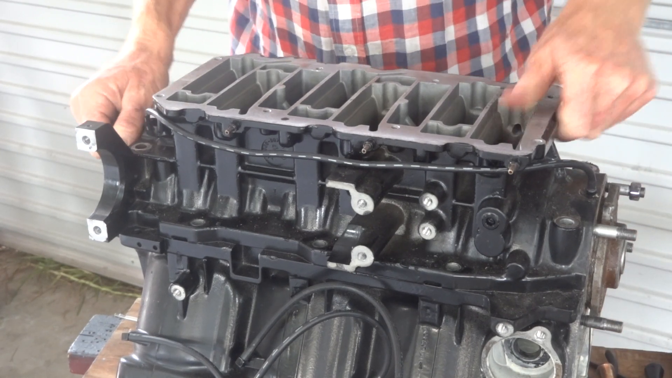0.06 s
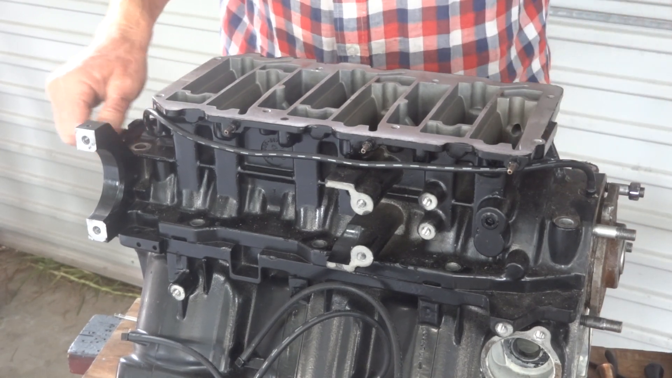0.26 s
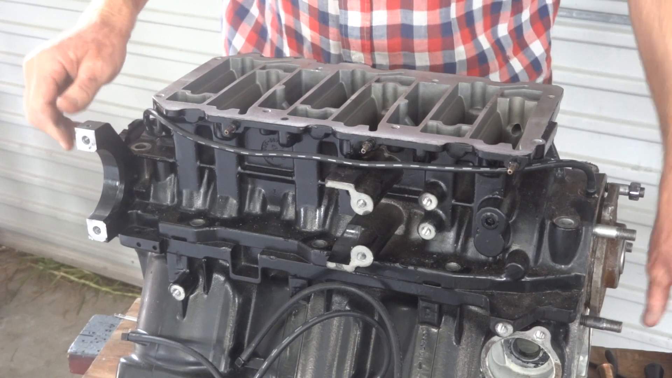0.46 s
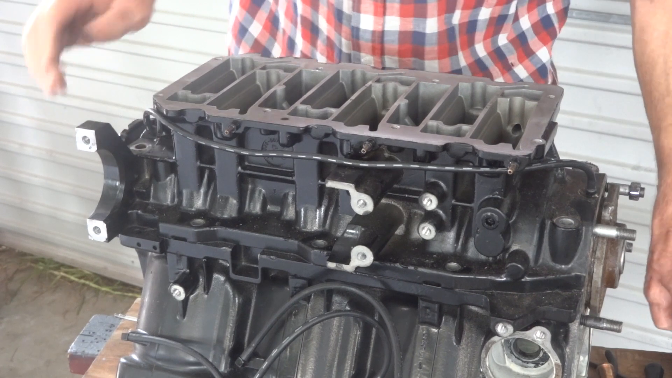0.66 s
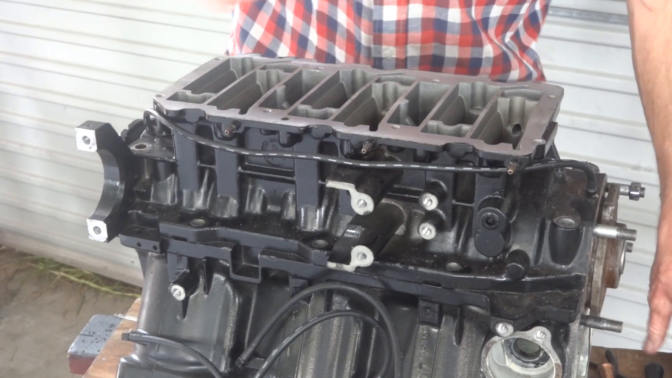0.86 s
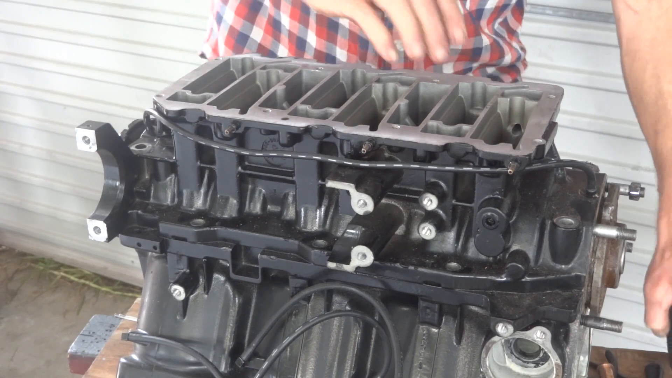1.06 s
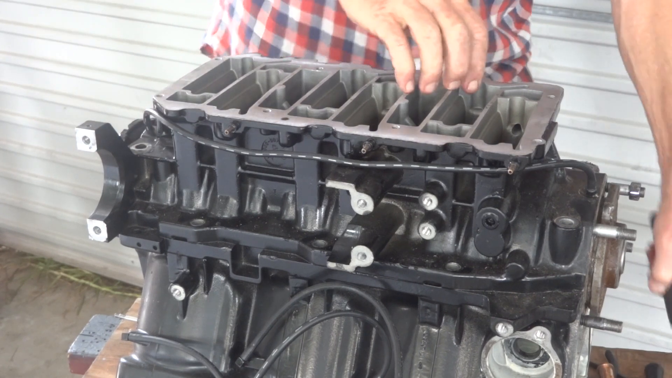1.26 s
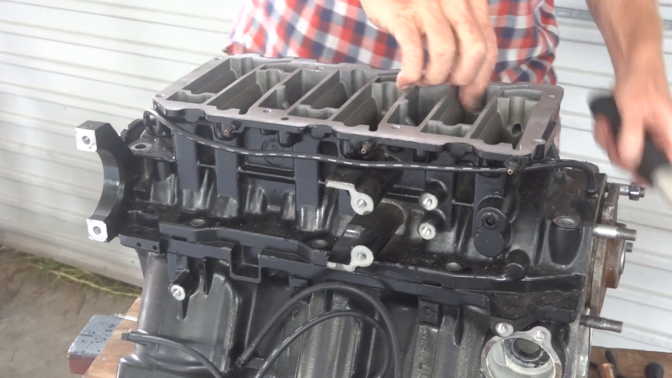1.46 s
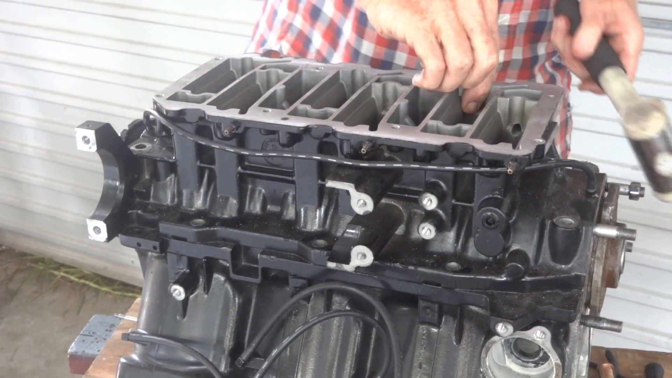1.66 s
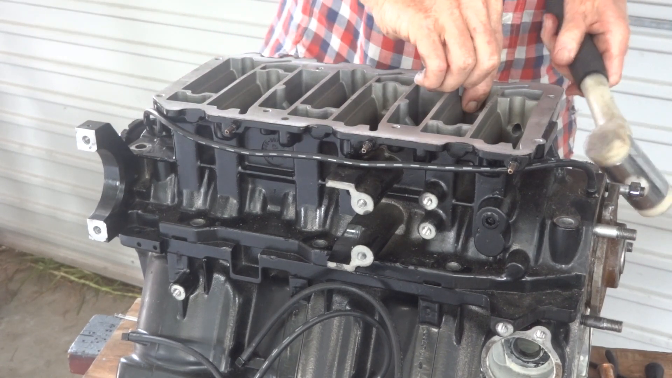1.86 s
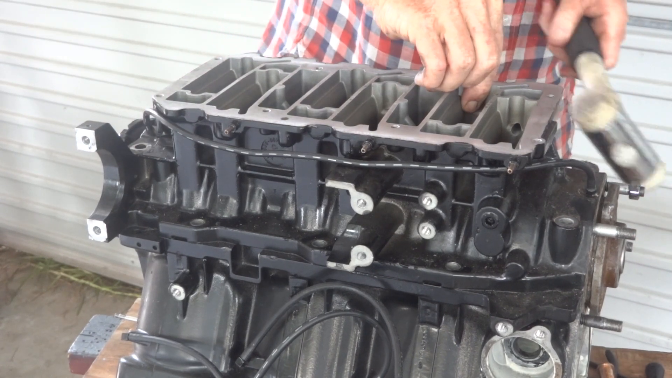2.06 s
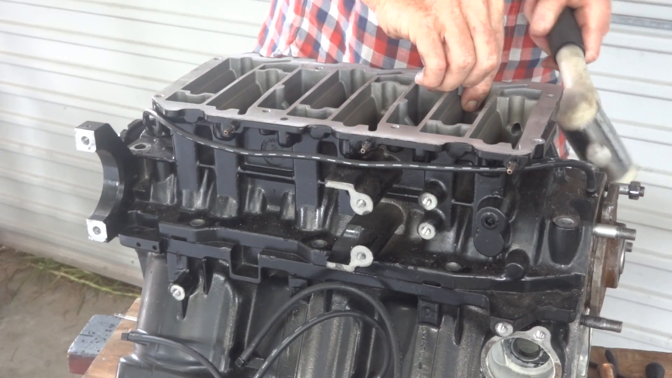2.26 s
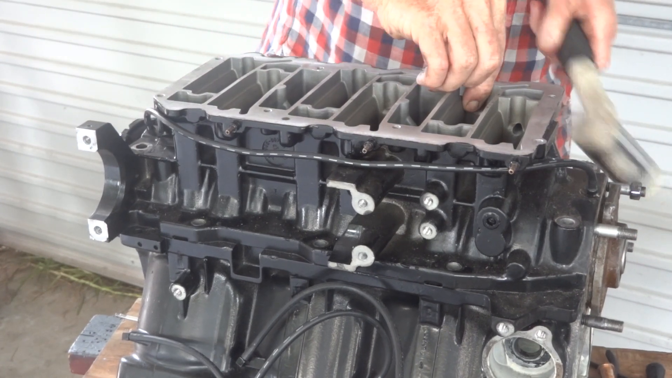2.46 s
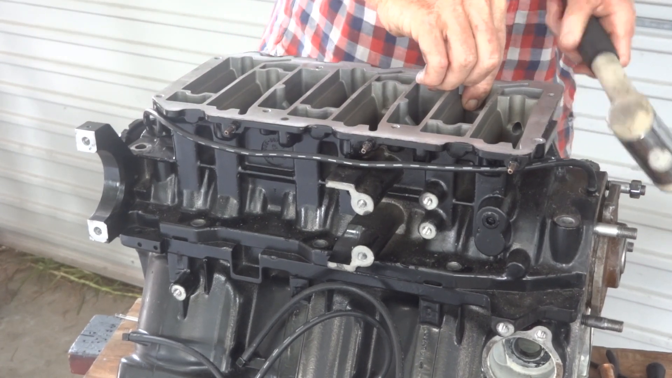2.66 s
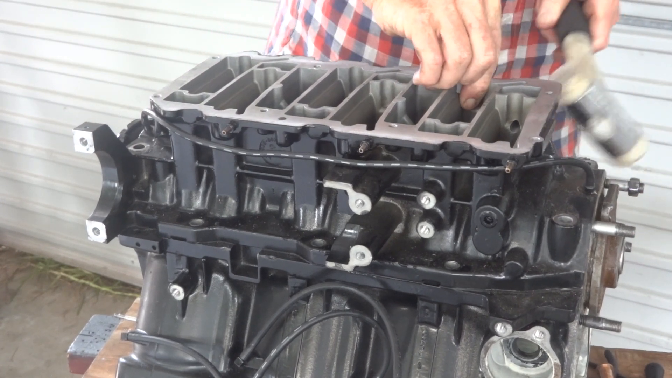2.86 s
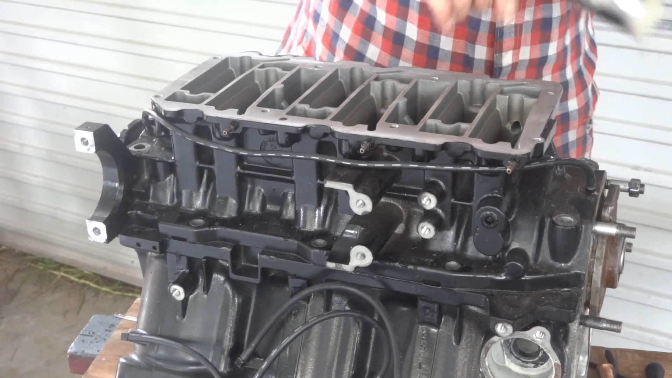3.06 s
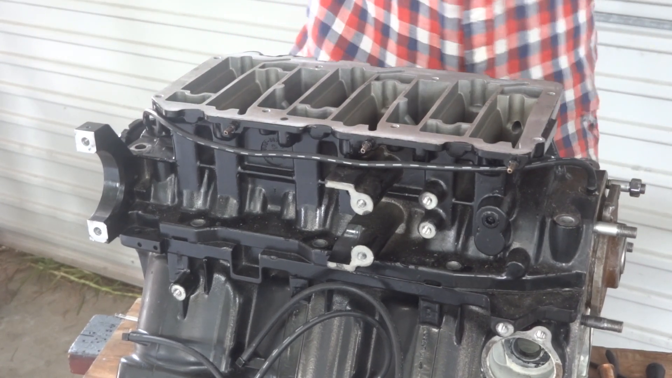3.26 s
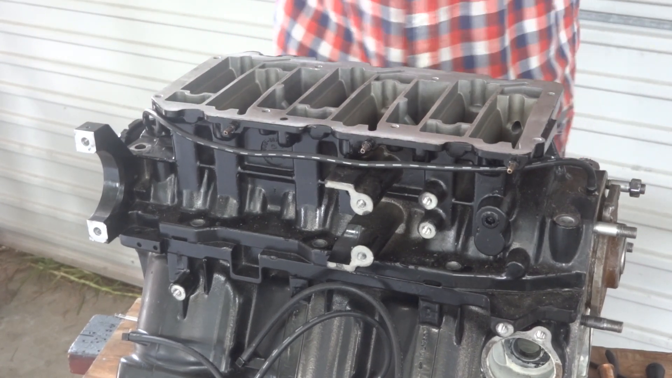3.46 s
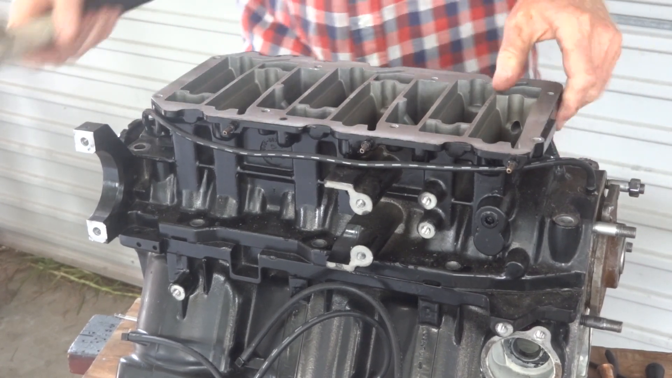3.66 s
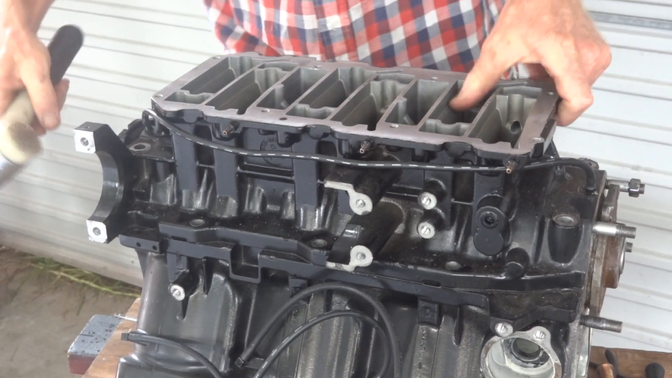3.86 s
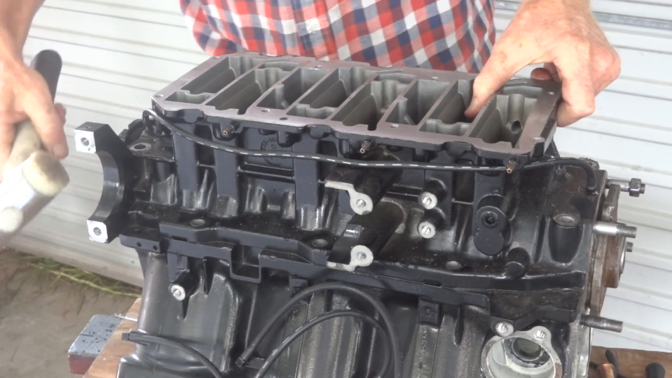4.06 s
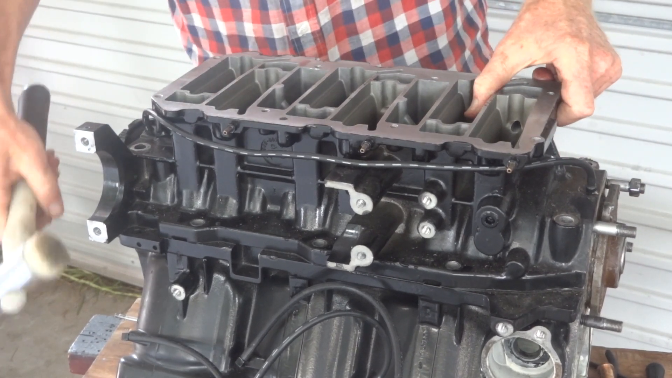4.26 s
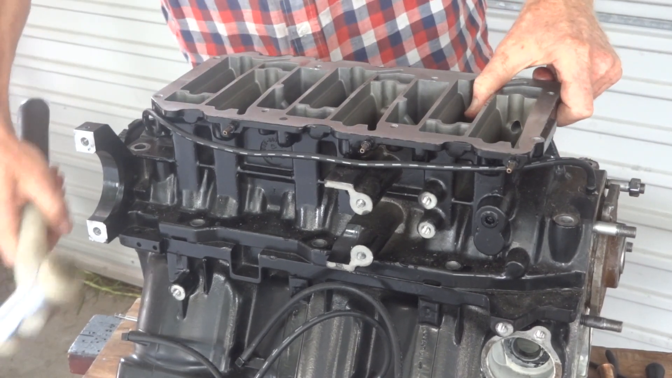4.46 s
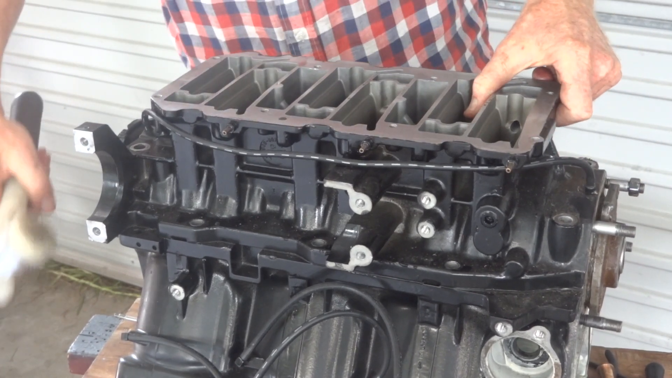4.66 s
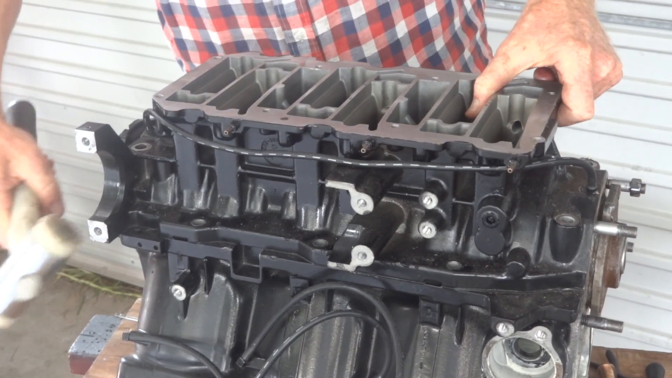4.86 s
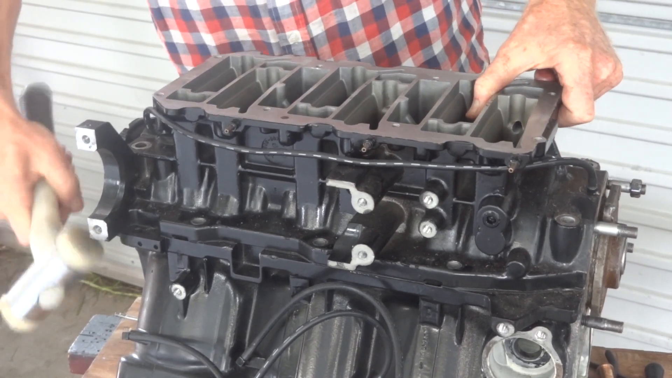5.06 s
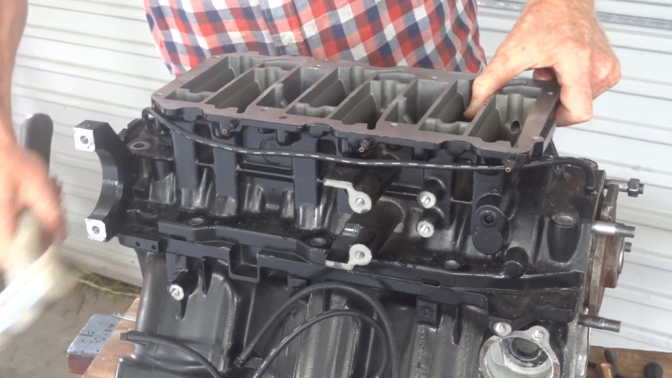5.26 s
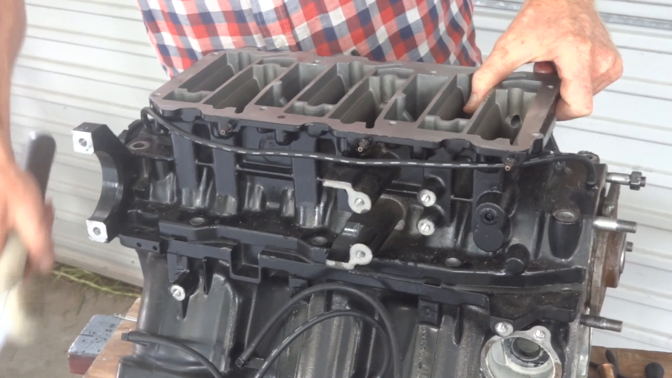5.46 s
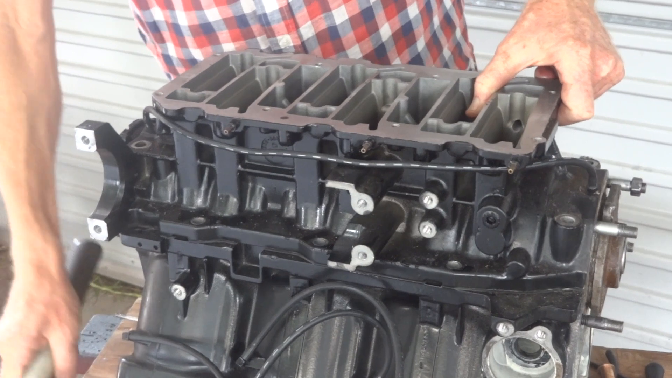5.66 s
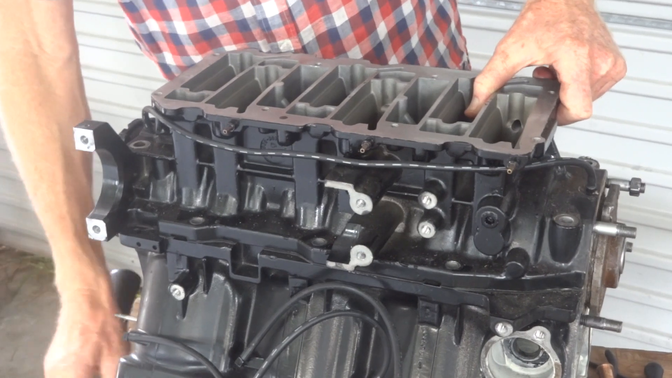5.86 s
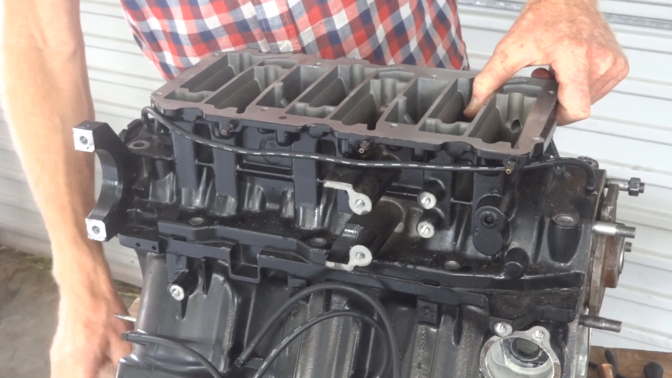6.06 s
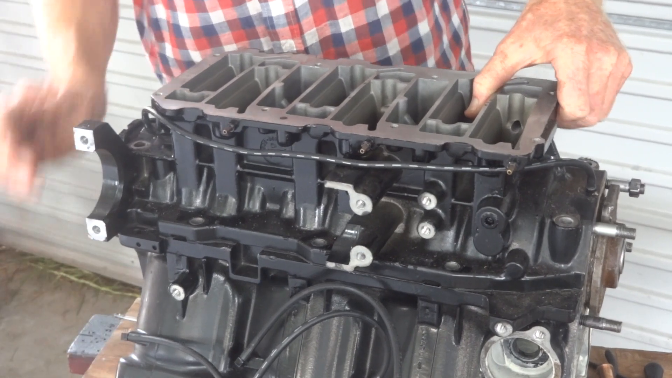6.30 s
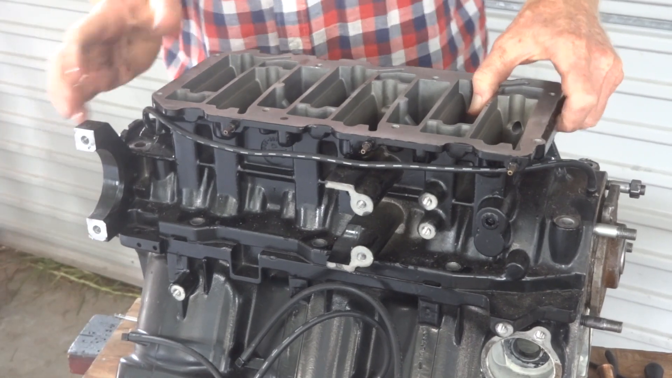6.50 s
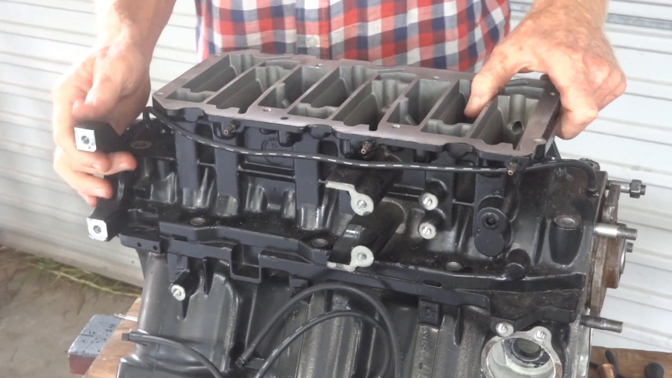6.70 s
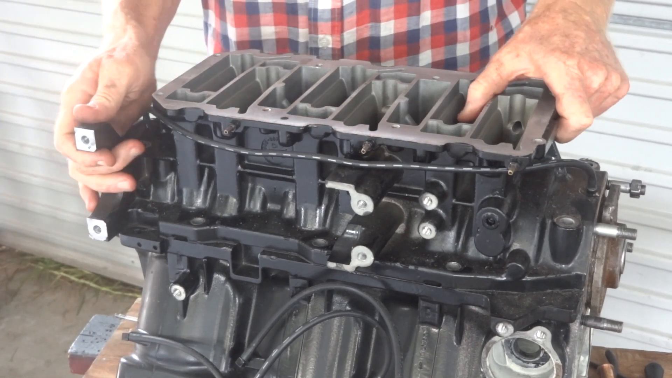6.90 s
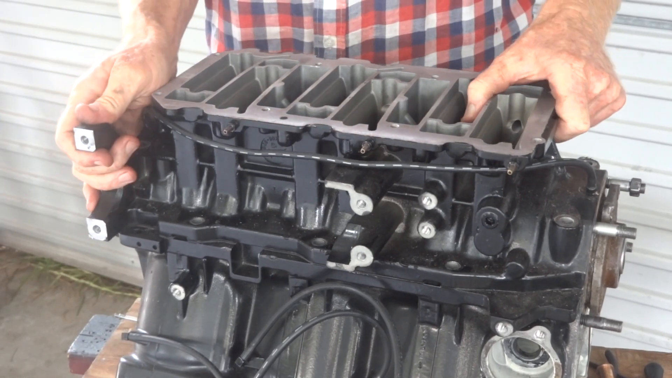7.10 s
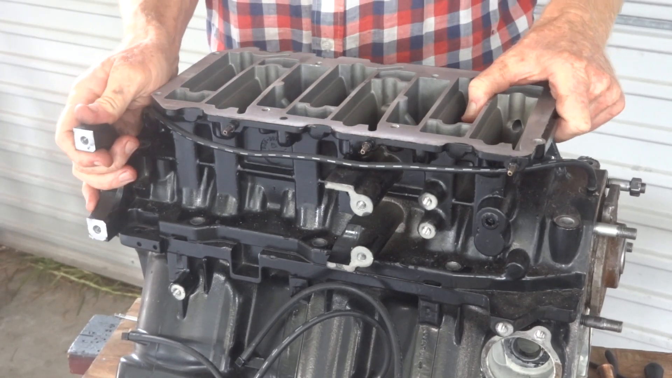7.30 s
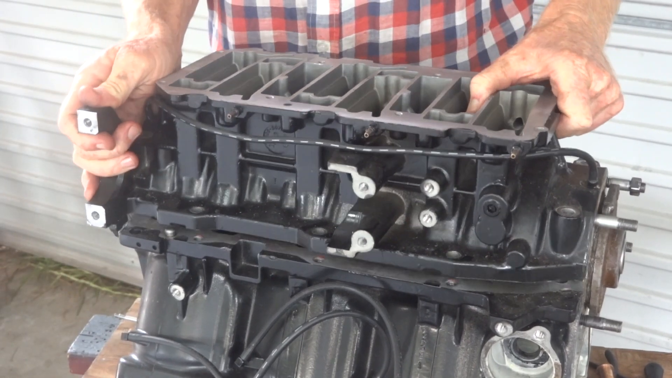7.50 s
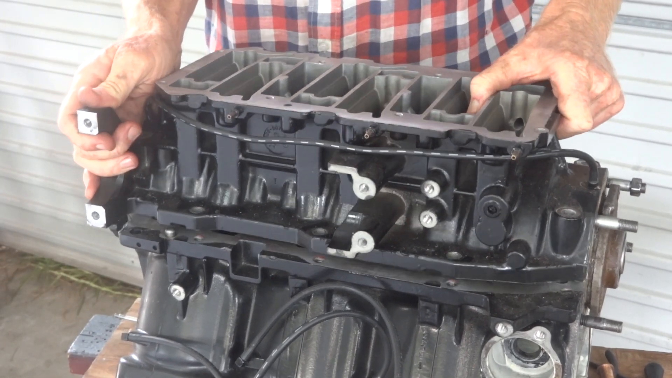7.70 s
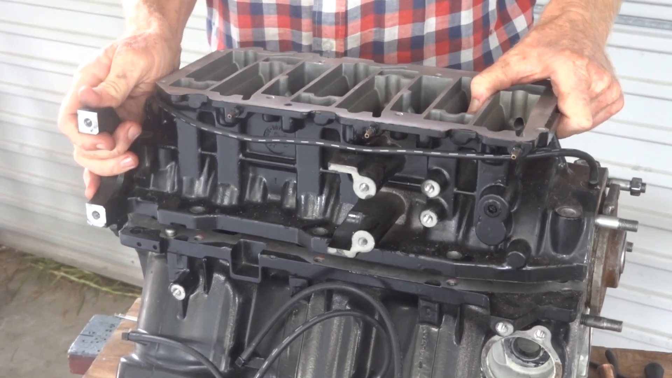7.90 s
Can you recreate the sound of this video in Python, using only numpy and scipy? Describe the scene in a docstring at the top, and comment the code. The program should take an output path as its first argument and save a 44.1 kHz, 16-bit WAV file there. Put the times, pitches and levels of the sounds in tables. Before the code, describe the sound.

Close stereo microphones in a workshop shed catch faint airy noise, low mains hum and thin insect buzz. After rustling and a wooden bump come four heavy mallet blows on a dense metal casting, which rocks and knocks on its supports. A gap follows, then four brighter blows at the other end, a thud as the mallet is laid down, small ticks, and finally a brief loose metal clank.

```python
"""A shed with a workbench: a soft mallet strikes a metal engine casting, four times at each end.
Blows are damped sines plus short-lived noise; the casting rocks and knocks on its wooden supports.
The mallet is picked up and laid down, cloth and hands rub (grainy noise), small parts tick (short sines and clicks),
and the loosened upper casting clanks as it is lifted. Behind them: air noise, a mains hum, a faint insect band and
a few faint gliding tones. A close pair of microphone ports hears it all and clips softly."""
import sys
import numpy as np
from scipy import signal
from scipy.fft import rfft, irfft, next_fast_len
from scipy.io import wavfile
from scipy.ndimage import map_coordinates

SR = 44100
rng = np.random.default_rng(int(sys.argv[2]) if len(sys.argv) > 2 else 0)


def file_out(sig):
    """Save sig as 16-bit WAV at sys.argv[1]."""
    # one column per channel
    cols = np.atleast_2d(sig).T
    # limit, then scale
    lim = np.clip(cols, -1, 1)
    pcm = np.round(lim * 32767).astype(np.int16)
    wavfile.write(sys.argv[1], SR, pcm)


N = 350020
SWAP_S = 4  # the mallet moves from the right end to the left (seconds)

# Mallet blows and rebounds. Each row: start in seconds, level in dB, knock on the supports in dB,
# hardness of that knock in dB, extra bass in dB, extra clang in dB, extra treble in dB, decay factor.
BLOWS = [(2.051, 0.5, -10.5, -5, -5, 0.5, 0, 0.95), (2.322, -0.5, -0.5, -22, 4.5, -1.5, -1, 1.23),
         (2.579, 1.5, -9, -18, 0.5, -2, -0.5, 1.45), (2.829, 1, -3, -10, -3.5, 2, 6.5, 0.93),
         (2.872, -8.5, -1.5, -14, 0.5, 3.5, 10.5, 1.42), (4.593, -0.84, -22, -8, 4.5, 0.5, -4, 1.174),
         (4.878, -1.3, -24, -2, 1, -0.2, -2, 1.27), (5.138, -0.46, -28, -4, 0, 0.5, -1, 1.44),
         (5.384, -2.5, -22, -7, -0.5, 2, 4, 1.51), (5.445, -5.5, -3.5, -9, -6, -7.5, -2, 0.87)]
# Clear modes of the casting. Each row: pitch in Hz, level in dB, basic time to fall 60 dB in seconds.
CASTING = [(1020, -17, .35), (1210, -4, 0.2), (1404, 2.5, 0.28), (1543, -1, 0.35), (1850, -13.5, 0.13),
           (2030, -9.5, 0.13), (2460, -18, 0.35), (3043, -5.5, 0.088), (3000, -7, 0.24), (3584, -2.5, 0.2),
           (4430, -9.5, 0.28), (7370, -6.5, 0.32), (9900, -24, 0.2056)]
# Modes of the wooden supports. Each row: pitch in Hz, level in dB, basic time to fall 60 dB in seconds.
SUPPORTS = [(123, -16.5, 0.14), (191.3, -3, 0.074), (265, -10.5, 0.065), (348.7, -1.5, 0.056),
            (369.4, -12.5, 0.23), (390, 4.5, 0.063), (462, -10, 0.11), (519, -4.5, 0.058),
            (633, -15.5, 0.099)]
# How far the extra bass reaches. Each row: frequency in Hz, share from 0 to 1.
BASS = [(150, 1), (500, 0)]


def amp(db):
    """Turn dB into a plain multiplier."""
    return 10 ** (np.asarray(db) / 20)


def unit(x):
    """Scale a sound to an average (RMS) strength of 1."""
    return x / np.sqrt(np.mean(x ** 2) + 1e-20)


def along(points, hz):
    """Read a curve of (Hz, value) points on a log frequency axis."""
    f, v = np.transpose(points)
    return np.interp(np.log(hz + 1), np.log(f + 1), v)


def curves(rows):
    """One value per sample for each column after the time."""
    s, *cols = np.transpose(rows)
    return [np.interp(np.arange(N) / SR, s, c) for c in cols]


def gate(start, length, edge):
    """1 while a sound lasts, with soft ends."""
    corners = [start, start + edge, start + length - edge, start + length]
    return np.interp(np.arange(N) / SR, corners, [0, 1, 1, 0])


def wobble(rate):
    """A smooth random curve, with rate random points a second."""
    points = rng.standard_normal(int(N * rate / SR) + 4)
    return map_coordinates(points, [np.arange(N) * rate / SR])


def filtered(x, response):
    """Multiply the spectrum of x by a (possibly complex) response to frequency."""
    m = next_fast_len(N + SR // 2)
    return irfft(rfft(x, m) * response(np.fft.rfftfreq(m, 1 / SR)), m)[..., :N]


def add(track, s, sound):
    """Lay a sound into a track at s seconds."""
    part = track[round(s * SR):][:len(sound)]
    part += sound[:len(part)]


def ring(modes, t, gain, stretch, rise, drift):
    """Damped sines, struck at new strengths each time; a wandering phase stands for close neighbours."""
    hz, db, t60 = np.transpose(modes)[:, :, None]
    luck_db = 2 * rng.standard_normal(hz.shape)
    level = amp(db + luck_db - 60 * t / (t60 * stretch)) * gain(hz)
    steps = rng.standard_normal((len(hz), len(t) // 32 + 1))
    # The phase takes one random step every 32 samples.
    wander = drift * np.cumsum(steps, axis=1).repeat(32, axis=1)[:, :len(t)]
    modes_sum = np.sum(level * np.sin(2 * np.pi * hz * t + wander), axis=0)
    return modes_sum * (1 - np.exp(-t / rise)) ** 2


def dying_noise(gain, size, length):
    """Noise shaped by gain(Hz, seconds) on a time-frequency grid."""
    hz, frames, z = signal.stft(rng.standard_normal(length), SR, nperseg=size)
    return signal.istft(z * gain(hz[:, None], frames), SR, nperseg=size)[1][:length]


def shed():
    """Broad air noise, an unsteady mains hum and a narrow band of insects."""
    # Each row: time in seconds, level of air and hum in dB, level of insects in dB.
    levels = [(0, -44.5, -59.5), (.8, -43.5, -56.5), (1.9, -44.5, -59), (2.3, -46.5, -69),
              (3.5, -48.5, -64), (4.5, -46.5, -62), (5.9, -50, -67), (6.5, -49.5, -63.5), (7.94, -47, -64)]
    # Colour of the air noise. Each row: frequency in Hz, level in dB per Hz.
    air_colour = [(20, 10.5), (40, 2), (70, -1.5), (120, -0.5), (200, -2.5), (400, -2.5), (800, -6.5),
                  (1500, -10.5), (3000, -16.5), (6000, -22), (12000, -25), (16000, -27)]
    # Left-right likeness of the air noise. Each row: frequency in Hz, likeness from -1 to 1.
    likeness = [(60, 1), (130, 0.64), (290, 0.028), (640, -0.4), (1410, -0.34), (3100, 0.037), (6820, 0.8),
                (15000, 1)]
    air_db, insects_db = curves(levels)

    def spread(hz):
        # A wider angle puts more of the noise into the left-right difference.
        angle = np.arccos(np.clip(along(likeness, hz), -1, 1)) / 2
        return amp(along(air_colour, hz)) * [np.cos(angle), np.sin(angle)]

    mid, side = filtered(rng.standard_normal((2, N)), spread)
    air = amp(.7 * wobble(14)) * unit(np.array([mid + side, mid - side]))
    hum_phase = 2 * np.pi * 100.3 * np.arange(N) / SR + .45 * wobble(12)
    hum = amp(1.2 * wobble(16)) * np.sin(hum_phase)
    insects = unit(filtered(rng.standard_normal(N), lambda hz: np.exp(-((hz - 3640) / 190) ** 2)))
    tilt_db = np.array([[.25], [-.25]])  # left a little louder than right
    steady = amp(air_db + tilt_db) * (air + amp(-5.5) * hum)
    return steady + insects * amp(insects_db + 1.4 * wobble(30))


def ticks():
    """Small steel parts tick: one bright mode with close neighbours and a click."""
    # Each row: start in seconds, level in dB, pitch in Hz, basic time to fall 60 dB in seconds.
    tick_rows = [(0.12, -40.5, 3680, 0.032), (2.873, -22.5, 4450, 0.057), (2.875, -20, 3020, 0.069),
                 (4.266, -38.5, 11300, 0.24), (5.449, -15, 12740, 0.091), (5.67, -45, 9700, 0.047),
                 (6.201, -49, 6290, 0.083), (6.291, -43, 6360, 0.13)]
    track, t = np.zeros(N), np.arange(SR // 4) / SR
    for s, db, hz, t60 in tick_rows:
        click = 0.95 * amp(-60 * t / 0.017) * rng.standard_normal(len(t))
        cluster = [(hz, 0, t60), (hz * 1.02, -5, t60), (hz * .97, -8, t60)]
        tone = ring(cluster, t, np.ones_like, stretch=0.94, rise=0.00017, drift=0.42)
        add(track, s, amp(db) * (tone + click))
    return track


def rubbing():
    """Cloth and hands: fibres slip in uneven grains; each stroke swells and fades."""
    # Each row: loudest moment in seconds, level in dB, swell in dB per second, fade in dB per second.
    strokes = [(0.83, -40.5, 105, 109), (0.898, -38.5, 119, 209), (1.126, -38, 178, 109),
               (1.333, -31.5, 230, 140), (3.409, -44, 149, 101), (6.46, -55.5, 22.5, 167)]
    # Colour of the rubbing. Each row: frequency in Hz, level in dB per Hz.
    cloth = [(200, -26), (400, -10), (620, -8), (900, -5), (1400, -6.5), (2100, -2), (2800, -8),
             (3400, -7.5), (6000, -9.5), (12000, -14.5), (16000, -19)]
    t = np.arange(N) / SR
    grain = amp(1.3 * wobble(60) + 2.2 * wobble(500)) * rng.standard_normal(N)
    hiss = unit(filtered(grain, lambda hz: amp(along(cloth, hz))))
    return hiss * sum(amp(db - np.maximum(swell * (s - t), fade * (t - s)))
                      for s, db, swell, fade in strokes)


def knock(db, hard_db, bass_db):
    """A dull knock of metal on wood; harder ones wake the higher modes more."""
    # Modes woken by hardness. Each row: pitch in Hz, level in dB, basic time to fall 60 dB in seconds.
    edge_modes = [(758, -3.5, 0.082), (940, -12.5, 0.078), (1152, -16, 0.05), (1433, -3, 0.039)]
    t = np.arange(SR // 6) / SR

    def depth(hz):
        return amp(bass_db * along(BASS, hz))

    dull = ring(SUPPORTS, t, depth, stretch=0.81, rise=0.0053, drift=0.031)
    hard = ring(edge_modes, t, depth, stretch=0.77, rise=0.0061, drift=0.38)
    return amp(db) * (dull + amp(hard_db) * hard)


def impacts(rows, wakes, modes, modes_db, crack_db, clatter_db, rise):
    """A crack, the part's clear modes and a clatter of dense modes die away; the supports knock too."""
    # Reach of extra clang and of extra treble. Each row: frequency in Hz, share from 0 to 1.
    clang_reach, treble_reach = [(900, 0), (3200, 1), (7000, 0)], [(3500, 0), (11000, 1)]
    # Dense modes and then first contact. Each row: frequency in Hz, level in dB per Hz.
    clatter, crack = [(60, -48), (120, 0.5), (180, -4), (380, 6), (520, 4.5), (900, -8.5), (1450, -9),
                      (2000, -13), (3300, -15), (5000, -19), (9000, -24), (12000, -32.5), (16000, -38.5)], [(200, -14), (700, 0.5), (1500, -12), (3300, 7), (5000, -34),
                                       (9000, -13.5), (16000, -31)]
    # Life of the clatter. Each row: frequency in Hz, basic time to fall 60 dB in seconds.
    fade_times = [(80, 0.69), (300, 0.45), (800, 0.28), (2000, 0.28), (4000, 0.2), (7000, 0.27),
                  (12000, 0.23)]
    track, t = np.zeros(N), np.arange(SR // 2) / SR

    for s, db, knock_db, hard_db, bass_db, clang_db, treble_db, stretch in rows:
        def colour(hz):
            extra_db = bass_db * along(BASS, hz) + clang_db * along(clang_reach, hz)
            return amp(db + along(wakes, hz) + extra_db + treble_db * along(treble_reach, hz))

        # Random spread for each frequency: first of level in dB, then of life as a share.
        luck_db, luck_life = rng.standard_normal((2, 257, 1)) * [[[2.5]], [[.07]]]

        def dense(hz, u):
            lives = u / (along(fade_times, hz) * stretch * (1 + luck_life))
            # A weaker, slower tail outlasts the first fall.
            fall = amp(-60 * lives) + amp(-16.5 - 24.2 * lives)
            return colour(hz) * amp(along(clatter, hz) + clatter_db + luck_db) * fall

        def first(hz, u):
            return colour(hz) * amp(along(crack, hz) + crack_db - 60 * u / 0.039)

        noise = dying_noise(dense, size=512, length=len(t))
        noise *= (1 - np.exp(-t / rise)) * np.minimum(1, 10 * (t[-1] - t))  # soft start and end
        contact = dying_noise(first, size=128, length=4096)
        noise[:4096] += contact * (1 - np.exp(-t[:4096] / 0.00038))
        ringing = amp(modes_db) * ring(modes, t, colour, stretch, rise, drift=0.38)
        add(track, s - .0002, noise + ringing)
        add(track, s - .001, knock(knock_db, hard_db, bass_db))
    return track


def bumps():
    """Things set down on the bench or bumped by hand wake the wooden modes and a clatter."""
    # The columns are those of BLOWS.
    bump_rows = [(0.888, -32, -27, 9, 2, 4, 9, 2.2), (1.221, -27, -27, -15, 14, -16, 0.1, 3),
                 (1.287, -6, 5.1, -6.5, -15.5, -29, 1, 0.75), (1.327, -14.5, -15, -14, 7, -2, 18, 0.8),
                 (3.309, -40, -60, -9, -5, 5, 24, 0.66), (3.441, -30, -51, -5, -13.5, 8, 1, 0.48),
                 (5.011, -5.5, 0, 1.5, -14, -4, -3, 0.82), (5.867, -35.5, -53, 2, -9, 7, 0.1, 0.58),
                 (5.93, -27, -35, 8, 5, 7, 6, 0.54), (5.96, -1.5, -2, -15, 2, -4, -5, 1.4),
                 (6.163, -16.5, 4.5, -7, 0.5, -7, -23, 0.96), (6.186, -9.5, -17, -10, 12.5, 0.5, -23, 0.89),
                 (6.288, -22, -37, -9, -14, 13.5, -1, 0.6), (6.589, -39, -44, 2, -3, -3, -6, 0.59)]
    # What the contact wakes. Each row: frequency in Hz, level in dB.
    bench = [(150, -12.5), (390, -15), (740, -5.5), (1450, -11), (3500, -13), (7000, -24), (12000, -18)]
    return impacts(bump_rows, bench, SUPPORTS, modes_db=-11.0, crack_db=-4, clatter_db=12.5, rise=0.0055)


def rocking():
    """The casting rocks on its supports: each rock knocks once and settles in two more knocks."""
    # Each row: start in seconds, level in dB, hardness in dB, loss to each following knock in dB.
    rocks = [(1.357, -12, -25, 5.5), (2.103, -4.5, -8, 16), (2.154, -8.5, -4.5, 5), (2.383, -4.9, -0.5, -1),
             (2.491, -18, -26, 16.5), (2.613, 2, -12, 5.5), (2.684, -7, -9.5, 5), (2.76, -4.5, -24, 1.5),
             (2.932, -6, -17, 18), (3.046, -5.5, -21, 7), (3.149, -22.5, -20.5, 8), (4.665, -6, -13.5, 24),
             (4.72, 1.5, -11.5, 11), (4.789, -16, -9, 0.5), (4.955, -4.5, -16, 13), (5.085, -11.5, -5, 14),
             (5.18, -11, -19, 21), (5.217, -0.5, -15, 16), (5.282, -5, -12.5, 5), (5.353, -9, -12, 23),
             (5.518, -5, -24, 19), (5.567, -9.5, -13, 14), (5.622, -13.5, -5, 2), (5.679, -19, -12, 15),
             (5.987, 3.5, -6, 6), (6.134, -15, -2, 28), (6.205, -7, -20, 17), (6.269, -17.5, -18, 10)]
    settle_s, scatter_s = 0.035, 0.0041  # gap between following knocks and its spread (seconds)
    track = np.zeros(N)
    for s, db, hard_db, loss_db in rocks:
        for k in range(3):
            late = k * settle_s + (k > 0) * scatter_s * rng.standard_normal()
            add(track, s + late - .002, knock(db - k * loss_db, hard_db, bass_db=-0.8))
    return track


def right_blows():
    """The mallet strikes the right end, waking the casting's modes, a crack and a clatter."""
    # What the contact wakes. Each row: frequency in Hz, level in dB.
    right_end = [(150, -9), (390, -12.5), (740, -10.5), (1450, -10.5), (3500, -14.5), (7000, -15),
                 (12000, -8.5)]
    rows = [blow for blow in BLOWS if blow[0] < SWAP_S]
    return impacts(rows, right_end, CASTING, modes_db=-21.0, crack_db=5.5, clatter_db=12.5, rise=0.001)


def whistles():
    """Faint, rough tones, some gliding, with a weak third harmonic."""
    # Each row: start in seconds, length in seconds, first pitch in Hz, last pitch in Hz, level in dB.
    tones = [(3.283, 0.21, 1164, 1164, -55), (3.79, 0.14, 896, 890, -65), (6.434, 0.368, 1373, 1293, -56.5),
             (6.912, 0.16, 905, 857, -63)]
    out = np.zeros(N)
    for s, length, first_hz, last_hz, db in tones:
        hz = np.interp(np.arange(N) / SR, [s, s + length], [first_hz, last_hz])
        phase = 2 * np.pi * np.cumsum(hz * (1 + .03 * wobble(300))) / SR
        level = np.sqrt(2) * gate(s, length, 0.031) * amp(db + 4.2 * wobble(150))
        out += level * (np.sin(phase) + 0.17 * np.sin(3 * phase))
    return out


def left_blows():
    """The mallet strikes the left end, where the clear modes ring louder against the clatter."""
    # What the contact wakes. Each row: frequency in Hz, level in dB.
    left_end = [(150, -9.5), (390, -18), (740, -9.5), (1450, -10.5), (3500, -4.5), (7000, -10.5),
                (12000, -3)]
    rows = [blow for blow in BLOWS if blow[0] > SWAP_S]
    return impacts(rows, left_end, CASTING, modes_db=-9.5, crack_db=4, clatter_db=14, rise=0.0014)


def clanks():
    """The loosened upper casting shifts and clanks as it is lifted, free to ring."""
    # The columns are those of BLOWS.
    clank_rows = [(7.186, -30, -55, 0, -16, 6, 11.5, 0.42), (7.209, -31, -42, -6, 5, 0.5, 4, 0.79),
                  (7.438, -26, -39, 0.1, -1, -4, 7, 0.7), (7.454, -3, -18, 13.5, -6, -3.5, -3, 0.47),
                  (7.489, -21, -34, 0.1, 9, -2, 10, 0.47), (7.521, -16, -17.5, 8, 3, -1, 1.5, 1.14),
                  (7.553, -21.5, -24, 5, 8, -7, -9, 0.69)]
    # What the contact wakes. Each row: frequency in Hz, level in dB.
    loose = [(150, -9.5), (390, -17), (740, -12.5), (1450, -12), (3500, -8.5), (7000, -7.5), (12000, -2.5)]
    # Modes of the upper casting. Each row: pitch in Hz, level in dB, basic time to fall 60 dB in seconds.
    lifted = [(374, -9, 0.62), (646, 7, 0.19), (894, 3, 0.083), (1397, 5, 0.12), (1670, -21, 0.3),
              (2266, -11.5, 0.55), (2630, -4, 0.114), (3150, 3.5, 0.15), (3520, -5, 0.29),
              (4370, -11, 0.24), (4834, -18, 0.66), (6030, -8, 0.12), (6500, -15.5, 0.34),
              (7400, -16, 0.42)]
    return impacts(clank_rows, loose, lifted, modes_db=-5.5, crack_db=2.3, clatter_db=11.5, rise=0.0012)


def ports(x, lead, left_db):
    """Two close ports hear one source with a small phase and level difference."""
    sign = np.array([[.5], [-.5]])  # each port takes half of the difference

    def response(hz):
        turn = np.exp(1j * sign * along(lead, hz) * (hz < 8000))
        return turn * amp(sign * left_db * (hz < 900))

    return filtered(x, response)


def walls(x, wet_db):
    """The shed answers a little differently at each port, mostly in the middle of the range."""
    # Each pair: frequency in Hz, level in dB.
    colour = [(100, -29.5), (500, 0.5), (2000, -4.5), (5000, -11.0), (12000, -34)]

    def decay(hz, u):
        return amp(along(colour, hz) - 60 * u / 0.31)

    tails = np.array([dying_noise(decay, size=256, length=SR // 4) for port in "LR"])
    tails /= np.linalg.norm(tails[0])
    return amp(wet_db) * signal.fftconvolve(x[None], tails, axes=1)[:, :N]


def scene():
    """Place the sounds at the two ends, let the ports hear them, and add the shed around them."""
    # How far the left port leads for each end. Each row: frequency in Hz, lead in radians.
    lead_right, lead_left = [(0, 0), (340, 0.39), (690, 0.55), (3010, 0.36), (3360, 0.05), (4820, 0.027),
                             (16400, 0.31)], [(0, 0), (340, 0.37), (690, 0.58), (4910, 0.18),
                                                 (16400, -0.0)]
    rocks = rocking()
    before_swap = np.arange(N) < SWAP_S * SR
    right = right_blows() + rocks * before_swap + rubbing()
    left = left_blows() + rocks * ~before_swap + ticks() + bumps() + clanks()
    near = ports(right, lead_right, left_db=0.0) + ports(left, lead_left, left_db=0.3)
    return near + walls(right + left, wet_db=-19.0) + whistles() + shed()


def record(dry):
    """The microphone loses deep bass, rounds off peaks near full scale and cuts the highest treble."""
    top_hz, ceiling = 15800, 1.05
    cut = signal.sosfilt(signal.butter(3, 62, "high", fs=SR, output="sos"), dry)
    held = cut / (1 + np.abs(cut / ceiling) ** 4) ** (1 / 4)
    return filtered(held, lambda hz: hz < top_hz)


dry = scene()
out = record(dry)
file_out(out)
```